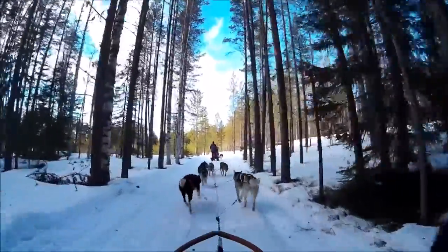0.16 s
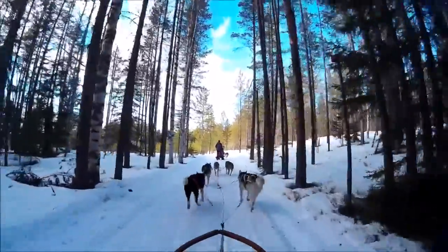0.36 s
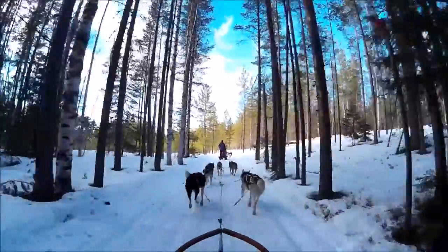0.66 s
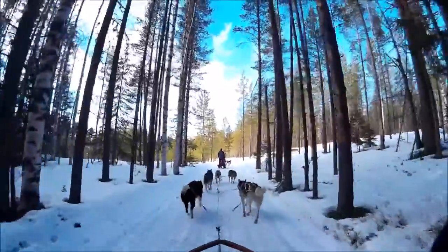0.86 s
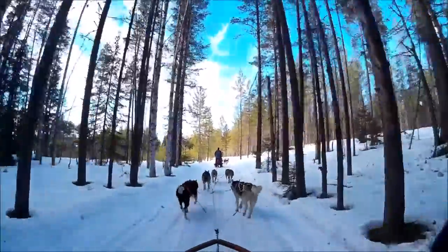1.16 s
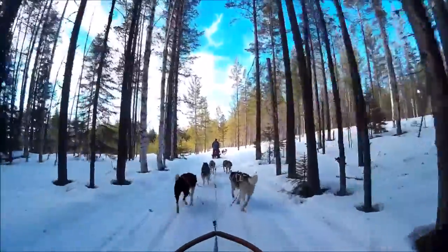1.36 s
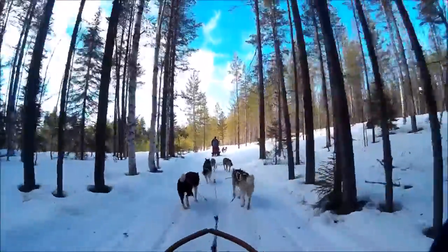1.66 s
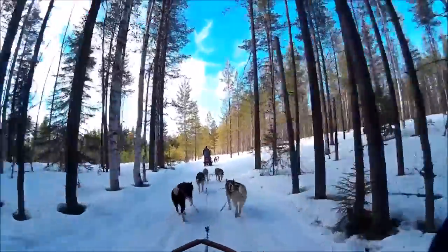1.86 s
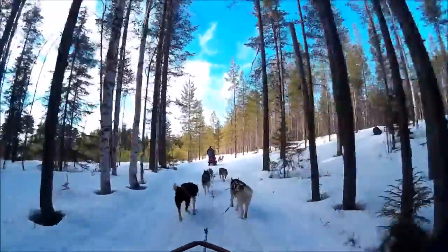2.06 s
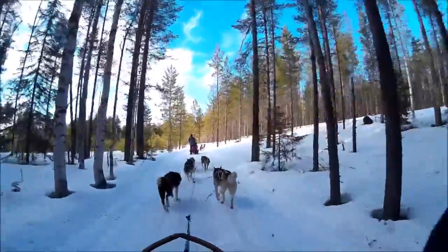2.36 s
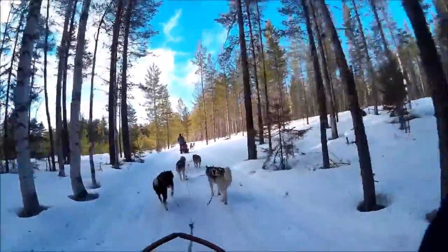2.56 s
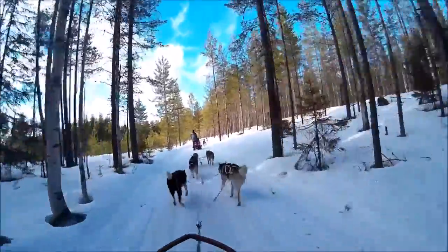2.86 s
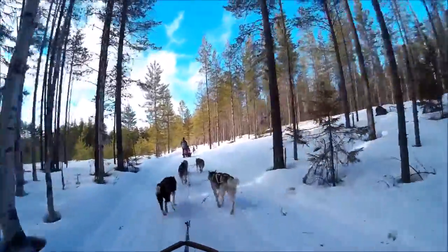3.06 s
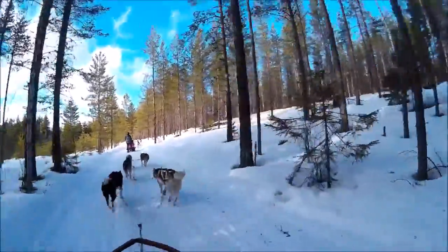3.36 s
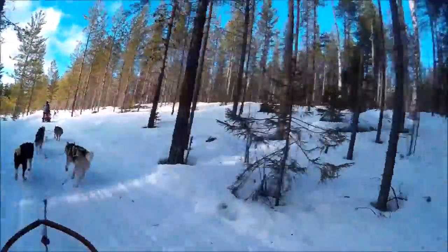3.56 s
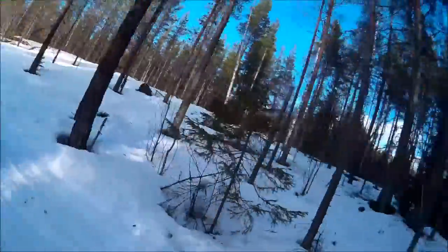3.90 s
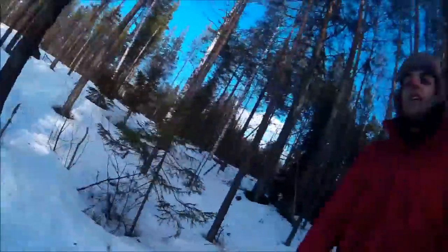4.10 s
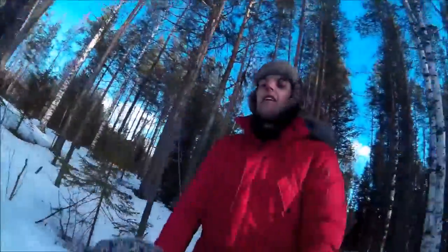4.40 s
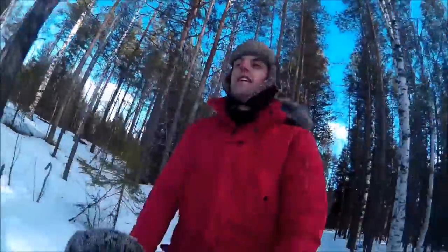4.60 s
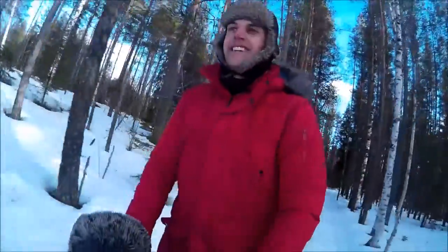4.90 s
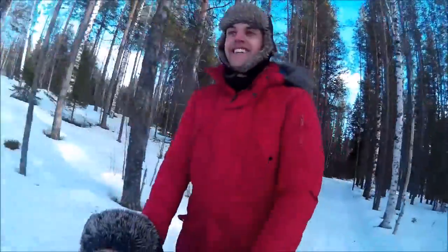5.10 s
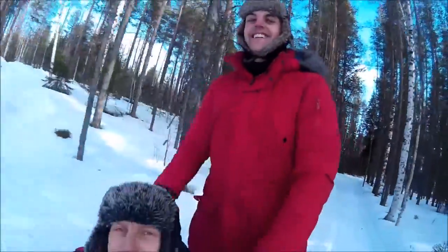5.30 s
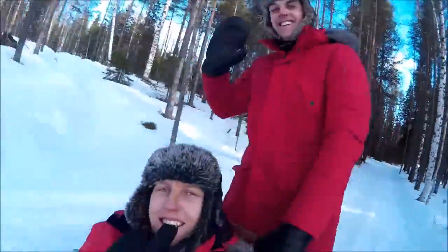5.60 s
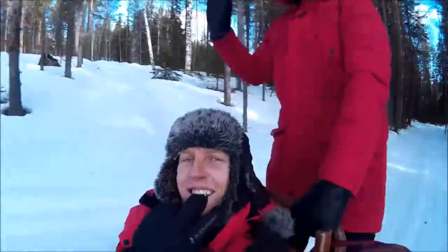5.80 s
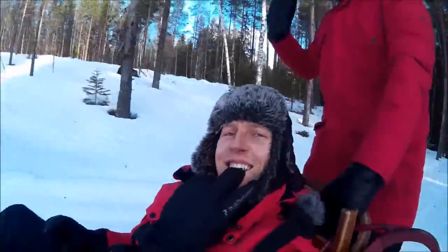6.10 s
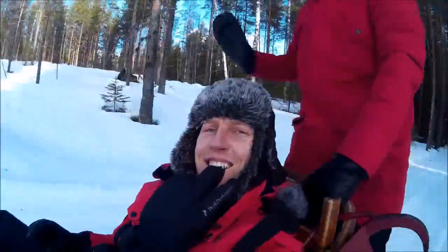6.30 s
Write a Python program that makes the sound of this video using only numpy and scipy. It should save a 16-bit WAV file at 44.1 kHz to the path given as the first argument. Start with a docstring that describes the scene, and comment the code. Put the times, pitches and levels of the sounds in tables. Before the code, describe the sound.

Riding on a dog sled, heard close through a small camera in a plastic housing: wind thumps and throbs at the microphone, snow scrapes roughly under the runners, and hollow wooden knocks come from jolts over bumps. After a calmer moment midway, the gusts and scraping swell, with heavier separate clunks and short puffs of thrown snow. Open outdoors, no echo.

```python
"""A packed forest trail: a dog sled glides along, heard by a small camera in a plastic housing.
Wind turbulence at the microphone port is filtered noise whose level follows slow curves and random gusts.
Runners grind and crunch over snow as clustered random clicks in noise; spray hisses by the same principle.
Jolts of the wooden frame are short noise bursts with an impulse, exciting resonances.
The camera's circuits add faint steady sinusoids."""
import sys
import numpy as np
from scipy import signal
from scipy.fft import rfft, irfft
from scipy.io import wavfile
from scipy.ndimage import uniform_filter1d

SR = 44100
rng = np.random.default_rng(int(sys.argv[2]) if len(sys.argv) > 2 else 0)


def level_to_linear(level):
    """Convert decibel levels to linear amplitude factors, elementwise."""
    exponent = np.asarray(level, float) / 20
    return 10 ** exponent


def transcribe(signal):
    """Save signal, clipped to [-1, 1], as a 16-bit WAV file at the path in sys.argv[1]."""
    frames = np.atleast_2d(signal).T
    limited = np.clip(frames, -1, 1)
    pcm = np.round(limited * 32767).astype(np.int16)
    wavfile.write(sys.argv[1], SR, pcm)


N = 284445

# Faint circuit tones: [f/Hz, rms level/dB]
CIRCUIT_TONES = [(9489, -88), (9525, -87), (9562, -88)]

# Slow course of the wind: [t/s, big-eddy level/dB, small-eddy level/dB]
WIND_LEVELS = [(0.0, -28, -31), (0.21, -25.5, -34.5), (0.5, -34.5, -36.5), (0.94, -41.5, -41),
               (1.05, -33.5, -37), (1.27, -24.5, -29), (1.46, -33, -38), (1.6, -25, -41),
               (1.75, -29, -23.5), (1.84, -24.5, -28.5), (1.92, -27.5, -22), (1.98, -24, -25),
               (2.02, -37, -28), (2.15, -30, -30), (2.28, -27, -27.5), (2.38, -31.5, -37),
               (2.49, -25.5, -25), (2.84, -23.5, -28.5), (3.0, -29, -27), (3.04, -38, -37),
               (3.35, -43, -39), (3.5, -38, -38.5), (3.58, -40, -34.5), (3.75, -40.5, -33),
               (4.0, -33, -29.5), (4.16, -33, -28.5), (4.22, -25, -20), (4.58, -30.5, -28),
               (5.05, -26, -17), (5.21, -21, -22.5), (5.26, -30.5, -23.5), (5.34, -17.5, -17),
               (5.53, -23, -25.5), (5.82, -23, -19.5), (5.96, -32, -26.5), (6.1, -28.5, -26),
               (6.19, -27, -25.5), (6.26, -30, -27), (6.36, -20, -21.5), (6.45, -36, -32.5)]
# Slow course of the middle eddies' throb: [t/s, level/dB]
THROB_LEVELS = [(0.0, -38.5), (0.27, -35.5), (0.95, -54.5), (1.08, -33), (1.29, -25), (1.46, -46.5),
                (1.54, -32.5), (1.89, -28.5), (1.98, -20), (2.05, -29.5), (2.32, -26), (2.35, -34),
                (2.55, -27.5), (3.02, -26.5), (3.03, -33.5), (3.45, -45), (3.54, -30), (3.63, -42.5),
                (4.04, -33), (4.15, -51), (4.22, -25.5), (4.47, -31.5), (5.08, -24), (5.12, -16),
                (5.26, -31.5), (5.34, -24), (5.57, -24.5), (5.78, -26.5), (6.07, -29.5), (6.45, -30)]
# Slow course of the lowest pressure swings: [t/s, level/dB]
THUD_LEVELS = [(0.0, -37), (0.3, -33.5), (0.92, -40), (1.3, -38), (2.3, -37.5), (3.0, -31), (3.6, -41.5),
               (4.5, -33.5), (5.1, -40), (5.6, -25), (6.45, -39)]
# Brief changes of the wind, mostly hard slaps: [t/s, big-eddy lift/dB, small-eddy lift/dB]
WIND_SLAPS = [(0.24, 3, 0), (1.18, 4, 9), (1.26, 5.5, -6), (1.197, -2, -5), (1.238, 1.5, 3),
              (1.304, 8.5, -2), (2.23, 7, -18), (2.87, 3, 0), (2.998, 13, -3), (3.534, 8.5, 12.5),
              (4.24, -2, -1.5), (4.597, 9, 5), (5.062, 6, 5), (5.12, 1, 1), (5.21, 3, 7.5), (5.31, 1, 4),
              (5.375, 0.5, 4), (5.487, 5.5, 7.5), (5.83, 8, 0)]
# Relative spectra of the eddies by size: [f/Hz, level/dB]
BIG_EDDY_SPECTRUM = [(50, -5), (100, 1.5), (150, 2.5), (220, -1), (330, -13.5), (800, -46)]
MIDDLE_EDDY_SPECTRUM = [(160, -12), (230, -1.5), (300, -0.5), (380, -2.5), (520, -15)]
SMALL_EDDY_SPECTRUM = [(150, -22), (300, -5), (450, 0), (750, -5), (1100, -10.5), (2000, -24), (3500, -48)]
SLAP_S = 0.013  # time from the centre of a slap to 1/e of its lift
FLUTTER_HZ, GUSTS_HZ = 76, 23  # upper limits of the random drifts
BIG_GUSTY_DB, SMALL_GUSTY_DB = 1, 0.53  # rms depth of the gusts

# Clearest frame jolts: [t/s, low-note peak level/dB, treble level re low note/dB, low-note f/Hz]
JOLTS = [(0.02, -22.5, -13, 1700), (0.128, -28, -13, 1500), (0.16, -40, -11, 1290),
         (0.208, -25.5, -8, 1630), (0.228, -35, 2, 1100), (0.354, -15.5, -13.5, 1050),
         (0.361, -25, -8, 1090), (0.381, -36, -4, 1400), (0.397, -20, -10.5, 1310), (0.446, -26, -15, 1310),
         (0.551, -18, -9, 1140), (0.65, -31, -7, 1400), (0.725, -26, -7, 1030), (0.876, -38, -2, 1400),
         (0.89, -33, 0, 1020), (0.899, -34, -7, 1600), (0.992, -35, -14, 900), (1.011, -29, -11, 1000),
         (1.148, -35, -9, 1000), (1.172, -31, 0, 925), (1.381, -22, -19, 1510), (1.574, -31, -3, 1010),
         (1.62, -38, -11, 1700), (1.686, -26, -7, 970), (1.73, -23, -11, 1600), (1.889, -30, -12, 1000),
         (1.974, -16, -24, 1510), (2.026, -30, -9, 1100), (2.117, -25, -7, 880), (2.164, -16, -11, 1050),
         (2.181, -13, -22, 1060), (2.217, -12.5, -8.5, 939), (2.226, -18, -9, 900), (2.269, -22, -10, 1100),
         (2.281, -27, -3, 1110), (2.292, -29, -6, 1300), (2.396, -15, -25, 880), (2.44, -21, -9, 1350),
         (2.492, -22, -8, 1100), (2.535, -26, -17, 1500), (2.56, -10.5, -28, 1430), (2.578, -17, -13, 1400),
         (2.61, -24, -18, 1500), (2.643, -15, -28, 1420), (2.712, -17.5, -16, 1330), (3.055, -25, -5, 900),
         (3.071, -15, -16.5, 1100), (3.08, -18.5, -10, 1130), (3.105, -21, -14, 1000),
         (3.149, -31, -3, 1040), (3.201, -27, -10, 1000), (3.2205, -21, -13, 1050),
         (3.2245, -14.5, -11.5, 1040), (3.236, -25, -14, 1000), (3.241, -17, -26, 950),
         (3.402, -24, -14, 1050), (3.598, -15, -15, 850), (3.659, -14, -26, 565), (3.686, -23, -12, 1100),
         (3.935, -25, -4, 870), (4.1818, -20, -24, 874), (4.7957, -17, -29, 1130), (5.0553, -13, -19, 1020),
         (5.194, -13, -21, 1030), (5.3035, -14, -18, 880), (5.321, -21, -12, 1100), (5.345, -25, -9, 990),
         (5.372, -18.5, -21, 900), (5.43, -27, -18, 950), (5.481, -15, -20, 800), (5.543, -18, -18, 1000),
         (5.6337, -7.5, -31, 1140), (5.655, -22, -14, 1000), (5.676, -13, -19, 1100),
         (6.11, -14.5, -20, 800), (6.358, -32, -10, 795)]
# Fixed modes of the frame: [f/Hz, bandwidth of one resonator pass/Hz, input level/dB]
FRAME_MODES = [(1846, 260, 5), (2500, 1100, -4), (3450, 480, -4), (5000, 500, -19), (7400, 4000, -29)]
TICKS_PER_S, TICK_HZ = 18, 1300  # small random rattles and their middle pitch
TICK_OVER_DB, TICK_SPREAD_DB = 2.5, 7  # mean level over the grinding, full random range
TICK_TREBLE_DB = -11  # relative to the low note
RATTLE_RISE_S, RATTLE_FALL_S = 0.0028, 0.0065  # 1/e times of a shake before and after its peak
BLOW, BITE = 22, 3  # impulse over the shake, for the low note and for the treble

# Slow course of the runner noise: [t/s, grinding level/dB, crunch level/dB]
RUNNER_LEVELS = [(0.0, -35, -50), (0.3, -36, -49), (0.55, -35.5, -47), (0.7, -32.5, -50), (0.8, -38, -61),
                 (0.85, -39, -58), (0.87, -43, -48), (0.9, -35, -50), (0.92, -47, -59), (0.985, -47, -66),
                 (1.0, -37, -54), (1.03, -32.5, -48), (1.3, -37.5, -49.5), (1.55, -31, -44),
                 (1.72, -30, -50), (1.85, -33, -43.5), (1.95, -54, -45.5), (2.03, -34, -50),
                 (2.1, -32.5, -48), (2.17, -27.5, -45), (2.37, -34.5, -50.5), (2.59, -27, -43),
                 (2.82, -35, -47.5), (2.98, -33, -38), (3.02, -31, -46), (3.08, -28.5, -42),
                 (3.13, -32, -44), (3.2, -33.5, -47.5), (3.33, -35.5, -46.5), (3.42, -31, -45.5),
                 (3.5, -33.5, -49), (3.61, -32.5, -44), (3.85, -33.5, -47), (3.93, -31, -43),
                 (4.15, -40, -44), (4.26, -28, -45), (4.42, -29.5, -42), (4.66, -34, -47.5),
                 (4.85, -28.5, -42), (4.97, -22, -38), (5.06, -35, -40), (5.17, -30, -38),
                 (5.26, -31, -39.5), (5.33, -26, -36), (5.45, -30.5, -43.5), (5.7, -30.5, -43),
                 (5.91, -34.5, -47), (6.14, -31.5, -40), (6.24, -36, -42.5), (6.33, -40, -40.5),
                 (6.45, -28, -41)]
# Slow course of the steady snow spray: [t/s, level/dB]
SPRAY_LEVELS = [(0.0, -62.5), (0.52, -61.5), (0.75, -65), (0.9, -66), (0.96, -70), (1.02, -62.5),
                (1.2, -60.5), (1.85, -59), (2.03, -60), (2.23, -58), (2.35, -61.5), (2.66, -56),
                (2.8, -60.5), (3.05, -58), (3.4, -57.5), (3.6, -56), (3.85, -56.5), (3.93, -53), (4.2, -53),
                (4.3, -55.5), (4.5, -54), (4.62, -57), (4.7, -52), (4.81, -56), (4.85, -62), (5.1, -61),
                (5.26, -60.5), (5.5, -59), (5.85, -59.5), (5.93, -61), (6.0, -59), (6.07, -53), (6.25, -56),
                (6.45, -52.5)]
# Sheets of loose snow thrown up: [start t/s, length t/s, spray level/dB, mist level/dB]
SNOW_SHEETS = [(1.859, 0.146, -50, -80), (2.11, 0.082, -55, -78), (2.214, .014, -42, -68),
               (2.485, .018, -52, -68), (2.555, .024, -53, -69), (2.84, 0.18, -54, -64),
               (3.057, 0.058, -55, -76), (3.93, .03, -57, -72), (4.07, .012, -49, -72),
               (4.432, .07, -70, -70), (5.261, 0.047, -54, -66), (5.329, 0.046, -51, -64)]
# Relative spectra of runner noise: [f/Hz, level/dB]
GRIND_SPECTRUM = [(500, -0.5), (800, 3), (1080, -2), (1280, -6), (1550, -3.5), (1850, -12.5), (2100, -33.5),
                  (3000, -23.5), (5000, -56)]
CRUNCH_SPECTRUM = [(1200, -37), (2000, -10.5), (2450, -14), (2950, -21), (3400, -17.5), (3800, -23),
                   (4500, -31), (5100, -43), (6200, -43)]
# Spray as coloured by the housing's cavities: [f/Hz, relative level/dB]
SPRAY_SPECTRUM = [(3000, -4), (5000, -0.5), (6300, -8.5), (7300, 0), (9300, -6.5), (10300, -7),
                  (12000, -19.5), (13500, -43)]
# Finest part of the spray: [f/Hz, relative level/dB]
MIST_SPECTRUM = [(10000, -14), (12000, -8.5), (13800, -9), (15200, -8), (15700, -12), (15800, -58)]
# The mist has level MIST_DB at spray level SPRAY_MID_DB and follows a share of the spray's changes
MIST_DB, MIST_FOLLOW, SPRAY_MID_DB = -71.5, 0.5, -59
SHEET_RISE_S, SHEET_FALL_S = 0.1, 0.019  # each at most half the sheet's length
JUDDER_HZ, RUTS_HZ = 31, 12.2  # upper limits of the random drifts
GRIND_RUTS_DB, CRUNCH_RUTS_DB, SPRAY_RUTS_DB = 1.1, 1.3, 1.1  # rms depth of uneven snow
GRIND_JUDDER_DB, CRUNCH_JUDDER_DB, SPRAY_JUDDER_DB = 0.5, 0.79, 0.8  # rms depth
CLUMPS_HZ, CLUMPY_DB = 45, 5  # crust gives way in bunches: drift limit, rms depth of the click rate


def evened(x):
    """Normalisation: scales a signal to unit rms."""
    return x / np.sqrt(np.mean(x ** 2) + 1e-20)


def curve(rows, t):
    """Linear interpolation: reads the columns of a time table at times t."""
    s, *columns = np.transpose(rows)
    return [np.interp(t, s, column) for column in columns]


def wobble(hz):
    """Band-limited random process: low-passed noise drifts with unit rms."""
    low_pass = signal.butter(2, hz, fs=SR)
    return evened(signal.lfilter(*low_pass, rng.standard_normal(N)))


def coloured(x, points):
    """Linear filtering: shapes x by a (f/Hz, level/dB) spectrum, closing steeply beyond its ends."""
    below = (points[0][0] / 2, -100)
    above = (points[-1][0] * 2, -100)
    f, db = np.transpose([below] + list(points) + [above])
    hz = np.fft.rfftfreq(N, 1 / SR)
    gain = level_to_linear(np.interp(np.log(hz + 1), np.log(f + 1), db))
    return evened(irfft(rfft(x) * gain, N))


def lumpy(x, patchy_db, size):
    """Spectral fluctuation: swells the short-time spectrum in random patches, size bins wide."""
    z = signal.stft(x, nperseg=512, noverlap=384)[2]
    patches = rng.standard_normal(z.shape[::-1]).T
    patches = uniform_filter1d(patches, size=size, axis=0)
    patches = evened(uniform_filter1d(patches, size=10, axis=1))
    return signal.istft(z * level_to_linear(patchy_db * patches), nperseg=512, noverlap=384)[1][:N]


def lumpy_noise(patchy_db, size):
    """Turbulent noise: white noise with a patchy short-time spectrum."""
    return lumpy(rng.standard_normal(N), patchy_db, size)


def ring(x, hz, width):
    """Resonance: two equal resonators in cascade, each of gain 1 at its peak."""
    peak = signal.iirpeak(hz, hz / width, fs=SR)
    return signal.lfilter(*peak, signal.lfilter(*peak, x))


def whine():
    """Superposition of steady sinusoids: thin tones from the camera's circuits."""
    t = np.arange(N) / SR
    return sum(np.sqrt(2) * level_to_linear(db) * np.sin(2 * np.pi * hz * t) for hz, db in CIRCUIT_TONES)


def wind():
    """Turbulent pressure on the port: big eddies buffet, middle ones throb, small ones roar."""
    t = np.arange(N) / SR
    big_db, small_db = curve(WIND_LEVELS, t)
    throb_db, = curve(THROB_LEVELS, t)
    thud_db, = curve(THUD_LEVELS, t)
    for s, big_lift_db, small_lift_db in WIND_SLAPS:
        slap = np.exp(-((t - s) / SLAP_S) ** 2)
        big_db = big_db + big_lift_db * slap
        small_db = small_db + small_lift_db * slap

    # one flutter is common to the three eddy sizes; gusts are partly shared
    flutter, gust, own = wobble(FLUTTER_HZ), wobble(GUSTS_HZ), wobble(GUSTS_HZ)
    mixed_gust = evened(gust + own)
    big_now = big_db + 1.08 * flutter + BIG_GUSTY_DB * mixed_gust
    small_now = small_db + 1.1 * flutter + SMALL_GUSTY_DB * gust
    middle_now = throb_db + 1.0 * flutter + SMALL_GUSTY_DB * mixed_gust

    big = level_to_linear(big_now) * coloured(lumpy_noise(patchy_db=2.0, size=2), BIG_EDDY_SPECTRUM)
    small = level_to_linear(small_now) * coloured(lumpy_noise(patchy_db=1.0, size=2), SMALL_EDDY_SPECTRUM)
    middle = level_to_linear(middle_now) * coloured(lumpy_noise(patchy_db=-0.3, size=2), MIDDLE_EDDY_SPECTRUM)
    thuds = coloured(rng.standard_normal(N), [(18, -2.0), (28, -13.0), (60, -9.0), (90, -11.0)])
    return big + middle + small + level_to_linear(thud_db) * thuds


def ticks():
    """Random point process: small rattles at random moments, their level following the grinding."""
    when, size, pitch = rng.random((round(TICKS_PER_S * N / SR), 3)).T
    s = when * N / SR
    db = curve(RUNNER_LEVELS, s)[0] + TICK_OVER_DB + TICK_SPREAD_DB * (size - 0.5)
    hz = TICK_HZ * 2 ** (pitch - 0.5)
    return [(a, b, TICK_TREBLE_DB, c) for a, b, c in zip(s, db, hz)]


def frame():
    """Forced resonance: a hard blow inside a short rough shake rings one low note and fixed modes."""
    length, lead = 3000, 600  # samples: one jolt, and its part ahead of the blow
    out = np.zeros(N + length)
    t = (np.arange(length) - lead) / SR
    soft_wood = signal.butter(4, 2200, fs=SR, output="sos")  # the low note carries little treble
    dull = signal.butter(2, 7000, fs=SR, output="sos")  # wood swallows the highest partials
    swell = np.exp(-(t / np.where(t < 0, RATTLE_RISE_S, RATTLE_FALL_S)) ** 2)
    blow = signal.unit_impulse(length, lead)
    for s, peak_db, treble_db, hz in ticks() + JOLTS:
        shake = rng.standard_normal(length) * swell
        low = signal.sosfilt(soft_wood, ring(shake + BLOW * blow, hz, 460))
        bitten = shake + BITE * blow
        modes = sum(level_to_linear(db) * ring(bitten, f, width) for f, width, db in FRAME_MODES)
        high = signal.sosfilt(dull, modes)
        jolt = low / abs(low).max() + level_to_linear(treble_db) * high / abs(high).max()
        out[round(s * SR):][:length] += level_to_linear(peak_db) * jolt
    return out[lead:][:N]


def grains(per_s, spread_db, smooth, clumps):
    """Random fracture: uneven clicks of snow crystals, bunched in clumps, with added smooth noise."""
    click = rng.random(N) < per_s / SR * level_to_linear(CLUMPY_DB * clumps)
    size = level_to_linear(spread_db * np.minimum(rng.exponential(1, N), 5)) * click
    return evened(size * rng.standard_normal(N)) + smooth * rng.standard_normal(N)


def runners():
    """Granular friction: grind, crunch and spray share one random judder over uneven snow."""
    t = np.arange(N) / SR
    grind_db, crunch_db = curve(RUNNER_LEVELS, t)
    spray_db, = curve(SPRAY_LEVELS, t)
    judder, ruts, clumps = wobble(JUDDER_HZ), wobble(RUTS_HZ), wobble(CLUMPS_HZ)

    spray_now = spray_db + SPRAY_RUTS_DB * ruts
    spray_gain = level_to_linear(spray_now)
    mist_gain = level_to_linear(MIST_DB + MIST_FOLLOW * (spray_now - SPRAY_MID_DB))
    for s, length, db, mist_db in SNOW_SHEETS:
        rise = (t - s) / min(SHEET_RISE_S, length / 2)
        fall = (s + length - t) / min(SHEET_FALL_S, length / 2)
        sheet = np.clip(np.minimum(rise, fall), 0, 1) ** 2
        spray_gain = spray_gain + level_to_linear(db) * sheet
        mist_gain = mist_gain + level_to_linear(mist_db) * sheet

    ground = grains(900, 3.6, smooth=1.28, clumps=clumps)
    grind = coloured(lumpy(ground, patchy_db=1.5, size=2), GRIND_SPECTRUM)
    crushed = grains(1200, 3.4, smooth=1.53, clumps=clumps)
    crunch = coloured(lumpy(crushed, patchy_db=2.0, size=6), CRUNCH_SPECTRUM)
    thrown = lumpy(grains(2500, 2.5, smooth=2.2, clumps=clumps), patchy_db=1.5, size=8)
    spray = spray_gain * coloured(thrown, SPRAY_SPECTRUM) + mist_gain * coloured(thrown, MIST_SPECTRUM)

    grind_now = grind_db + GRIND_JUDDER_DB * judder + GRIND_RUTS_DB * ruts
    crunch_now = crunch_db + CRUNCH_JUDDER_DB * judder + CRUNCH_RUTS_DB * ruts
    return level_to_linear(grind_now) * grind + level_to_linear(crunch_now) * crunch + level_to_linear(SPRAY_JUDDER_DB * judder) * spray


def scene():
    """Superposition: the pressures of all sources add at one microphone."""
    return (whine() + wind() + frame() + runners())[None]


def band_limit(x):
    """A steep low-pass at the top of the band."""
    return signal.sosfilt(signal.butter(12, 16440, fs=SR, output="sos"), x)


def record(dry):
    """Soft saturation: the preamplifier rounds off the strongest peaks."""
    mix = 0.79 * np.tanh(dry / 0.99)
    return band_limit(mix)


dry = scene()
out = record(dry)
transcribe(out)
```